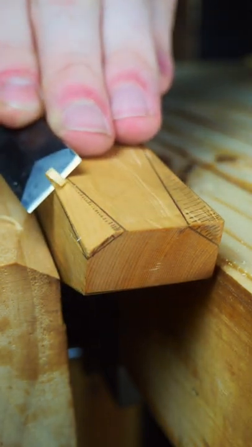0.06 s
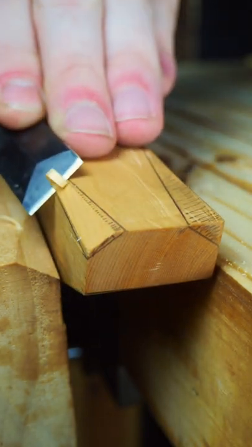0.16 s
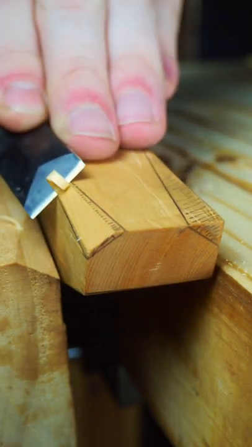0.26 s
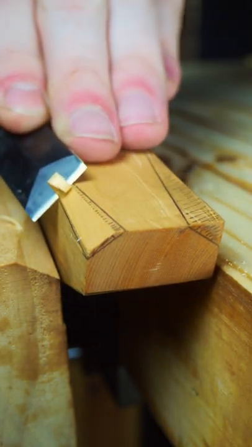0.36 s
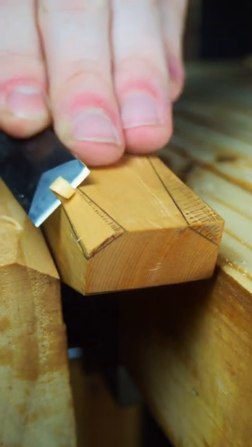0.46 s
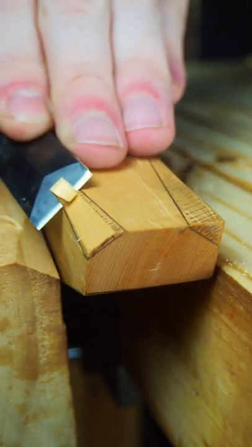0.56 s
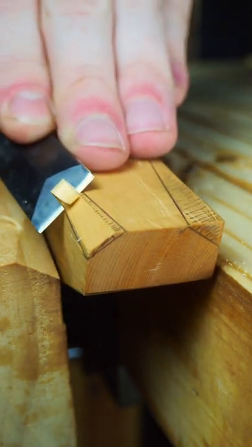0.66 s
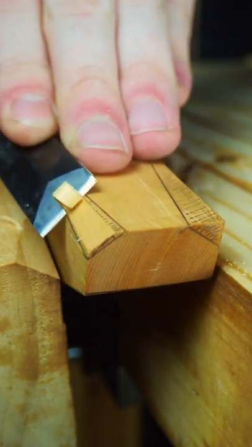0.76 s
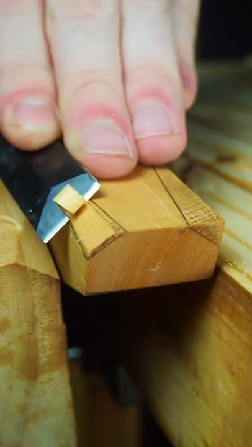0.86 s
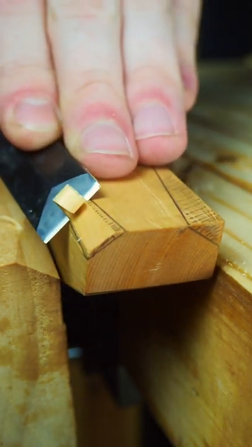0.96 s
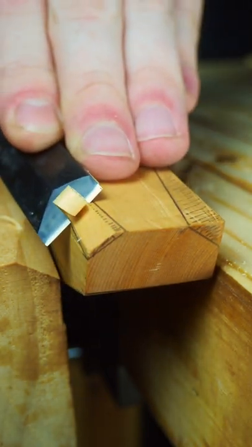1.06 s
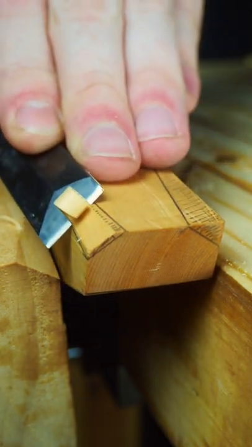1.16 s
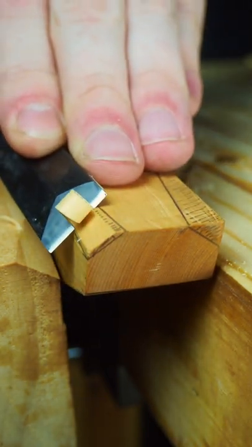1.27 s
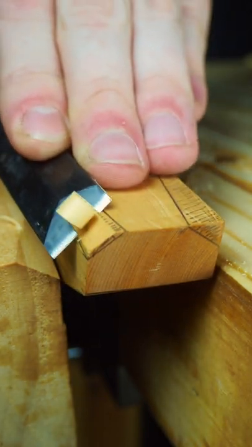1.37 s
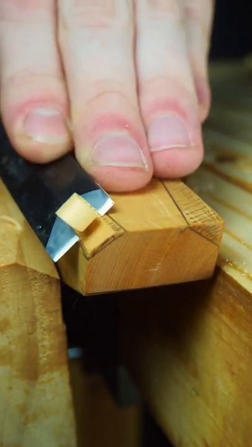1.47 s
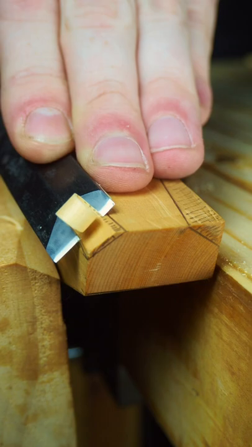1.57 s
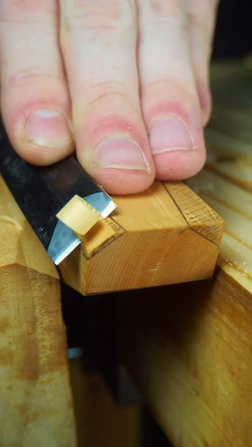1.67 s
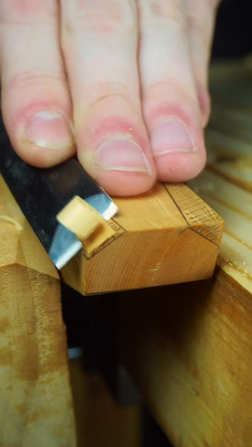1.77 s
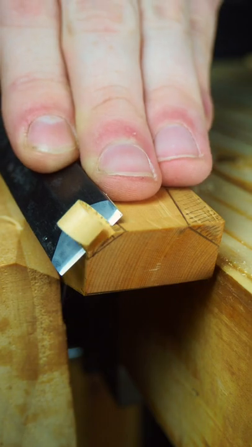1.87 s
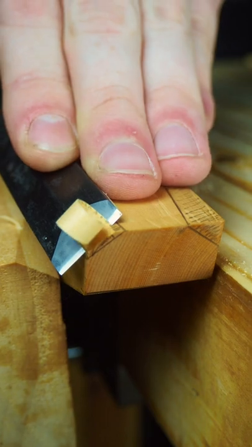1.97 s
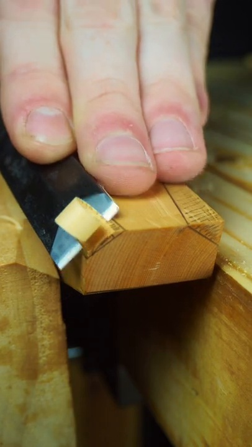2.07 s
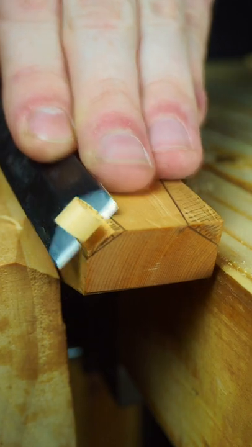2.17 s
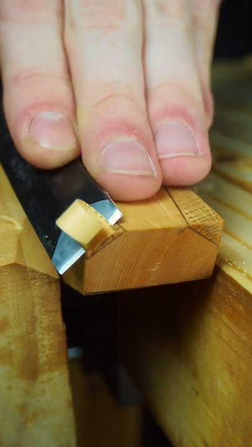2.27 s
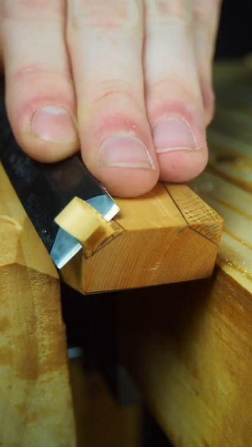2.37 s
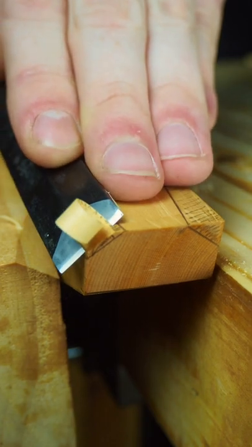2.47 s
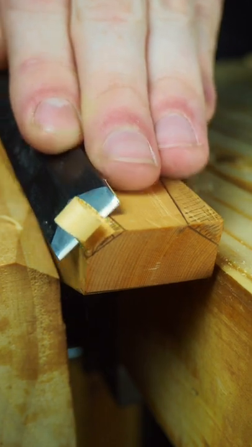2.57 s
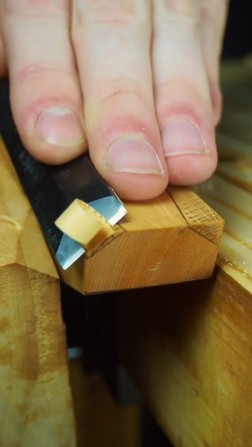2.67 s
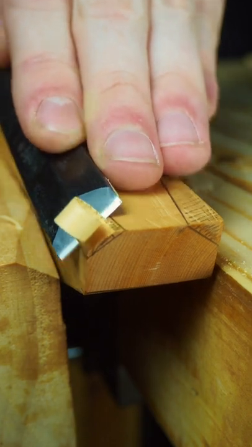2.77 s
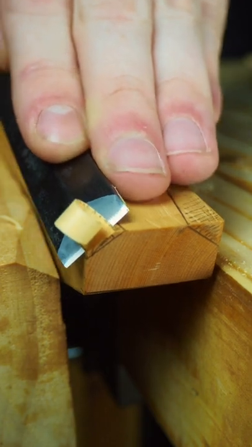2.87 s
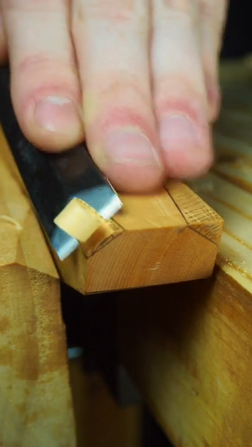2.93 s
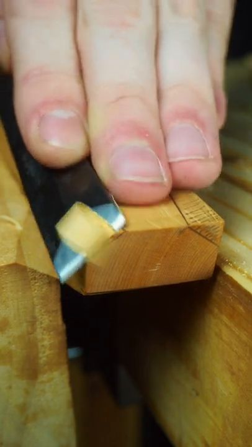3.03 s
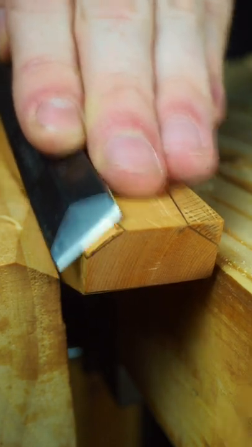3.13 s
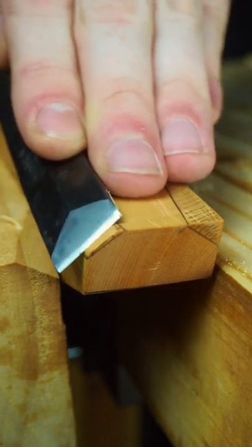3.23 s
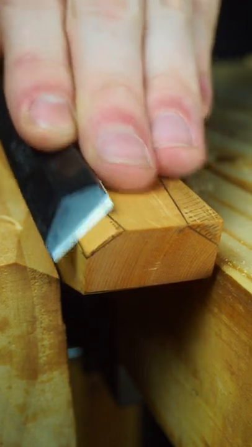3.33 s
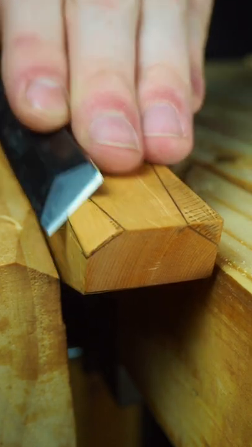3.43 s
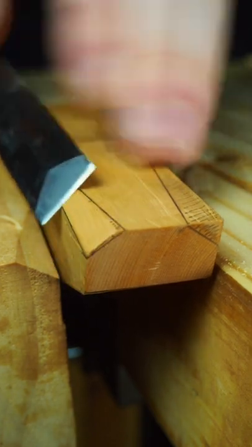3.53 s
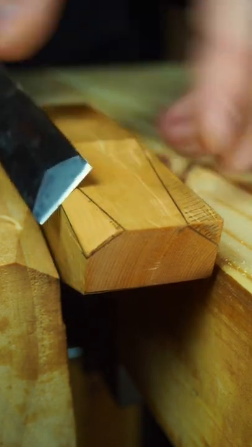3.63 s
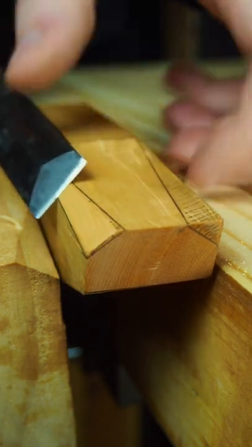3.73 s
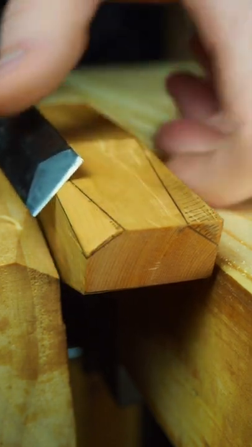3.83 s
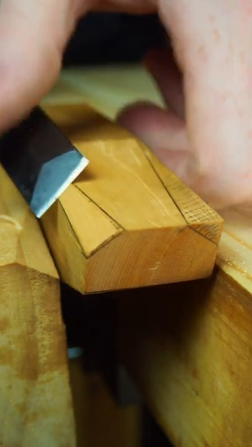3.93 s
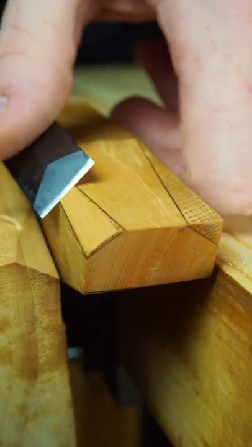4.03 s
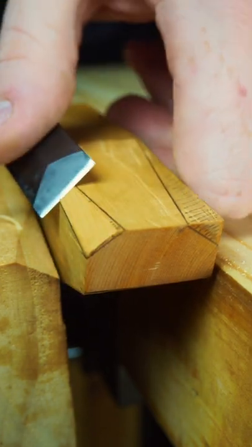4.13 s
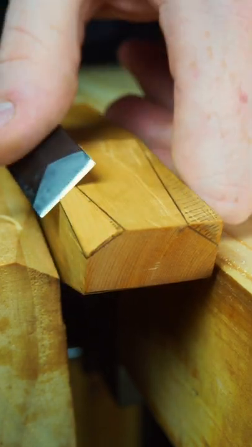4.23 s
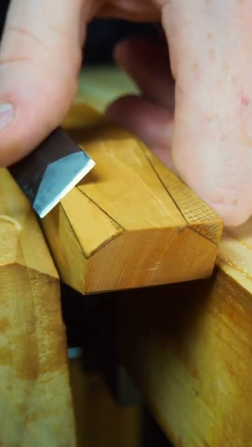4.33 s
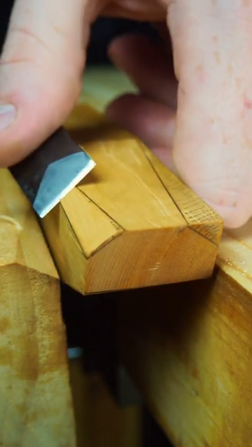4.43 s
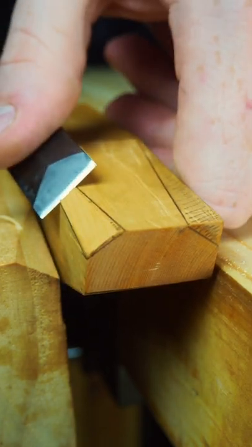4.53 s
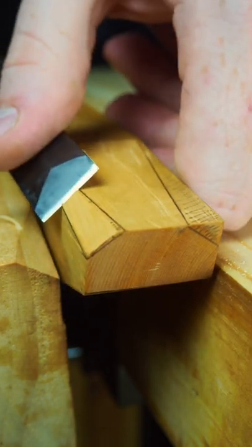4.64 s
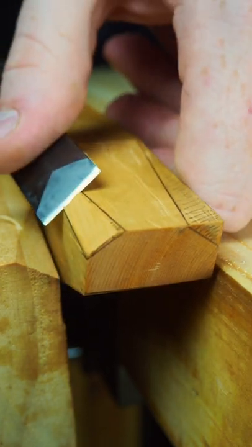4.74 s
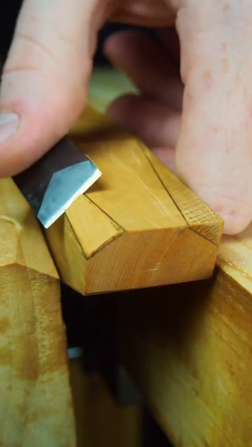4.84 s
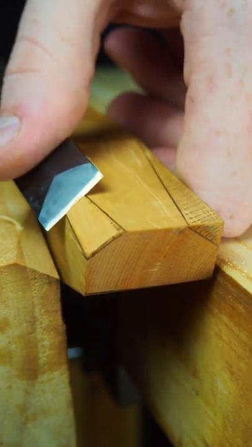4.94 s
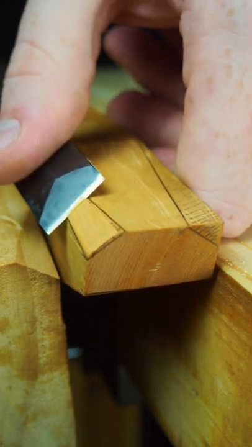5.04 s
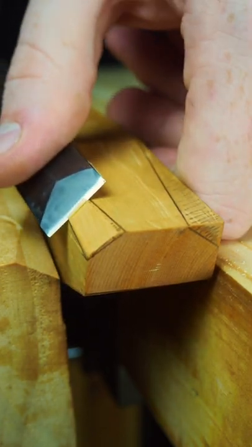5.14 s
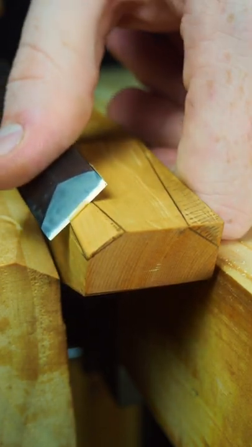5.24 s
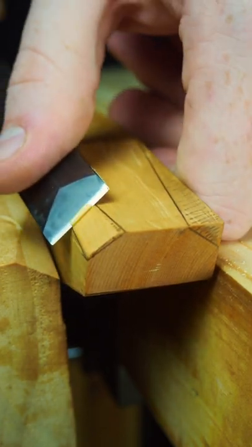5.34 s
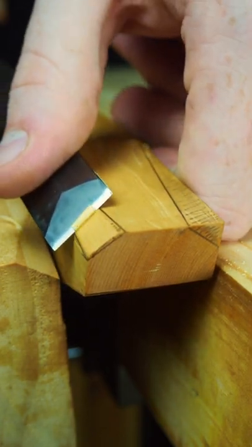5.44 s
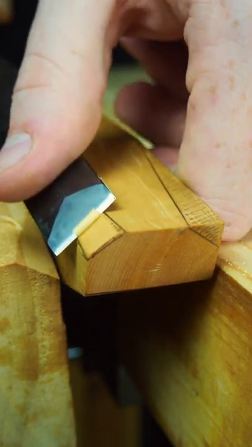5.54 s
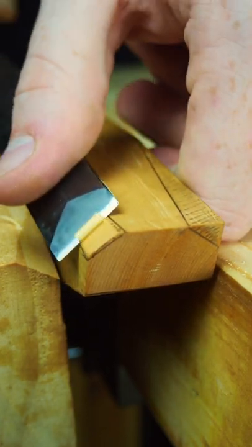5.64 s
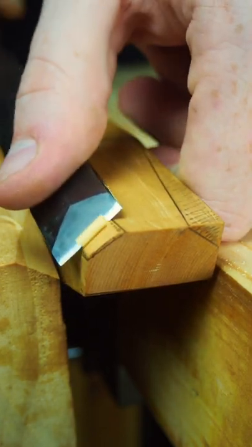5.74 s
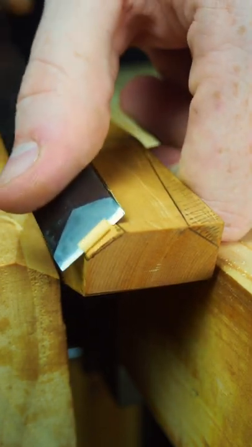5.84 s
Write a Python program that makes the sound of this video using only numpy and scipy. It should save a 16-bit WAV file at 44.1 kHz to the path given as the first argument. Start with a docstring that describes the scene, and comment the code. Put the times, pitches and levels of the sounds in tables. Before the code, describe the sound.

Dry wood fibres tear in brief uneven crunches under a steel blade, first light and bright, then deeper. Around the middle come hard low knocks and splintery cracks with tiny pings. After this, soft crackly finger touches, quiet air, and delicate scraping that slowly strengthens. Close stereo microphones, short room decay, faint hiss.

```python
"""Short nudges of a chisel through the corner of a clamped wooden block, heard close in stereo over quiet air.
Tearing fibres are dense random clicks that excite the resonances of bench, block and blade; late in the cut
the blade jerks free with knocks, and tiny very high pings, damped sine partials, cluster there. Fingers then
shift on the blade in puffs of filtered noise, and a second, softer cut begins. The air is shaped noise;
sparse decaying taps make the room."""
import sys
import numpy as np
from scipy import signal
from scipy.fft import rfft, irfft, next_fast_len
from scipy.io import wavfile
from scipy.ndimage import uniform_filter1d

SR = 44100
rng = np.random.default_rng(int(sys.argv[2]) if len(sys.argv) > 2 else 0)


def wav_record(signal):
    """Record a signal, one row per channel, as 16-bit PCM in the file named by sys.argv[1]."""
    frames = np.transpose(np.atleast_2d(signal))
    bounded = np.clip(frames, -1, 1)
    # unit amplitude maps onto the largest positive 16-bit level
    quanta = np.round(bounded * 32767).astype(np.int16)
    wavfile.write(sys.argv[1], SR, quanta)


N = 260190
# frequency grid [Hz] of the filters, padded by at least a second
HZ = np.fft.rfftfreq(next_fast_len(N + SR), 1 / SR)


def amp(db):
    """Decibel law: amplitude ratio of a level in dB."""
    return 10 ** (np.asarray(db) / 20)


def evened(x):
    """Normalisation to a mean power of one."""
    return x / np.sqrt(np.mean(abs(x) ** 2) + 1e-20)


def read(points, hz, order=1):
    """Interpolation of a table column along a logarithmic frequency axis."""
    columns = np.transpose(points)
    return np.interp(np.log(hz + 1), np.log(columns[0] + 1), columns[order])


def add(mix, s, sound):
    """Superposition: adds a sound to the mix in place, from s seconds on."""
    part = mix[..., round(s * SR):][..., :sound.shape[-1]]
    part += sound[..., :part.shape[-1]]


def through(x, response):
    """Linear filtering: the spectrum times a complex frequency response."""
    size = 2 * len(HZ) - 2
    return irfft(rfft(x, size) * response, size)[..., :N]


def slow_noise(width):
    """Low-passed noise: two running means over width samples, then unit power."""
    noise = rng.standard_normal(N)
    return evened(uniform_filter1d(uniform_filter1d(noise, width), width))


def air():
    """Workshop air as random short-time spectra, patchy in time and frequency, under a slow level."""
    # spectrum of the air before levelling: (frequency [Hz], relative level [dB per Hz])
    spectrum = [(15, -60), (25, -42), (53, -29), (66, -3.5), (87, -24), (141, 3.5), (180, -8), (503, -7.5),
                (641, -13), (1020, -5), (1330, -14.5), (1440, -12.5), (9840, -32.5), (14800, -43.5),
                (16000, -40)]
    # level of the air before the port gains: (time [s], level [dB])
    level_points = [(0.0, -57), (2.199, -56), (3.0, -49), (3.45, -55.5), (4.16, -61.5), (4.5, -64),
                    (5.4, -58.5), (5.9, -54.5)]
    # coherence of the two ports: (frequency [Hz], likeness [-1 to 1])
    likeness = [(60, 0.65), (180, 0.72), (550, 0.8), (1650, 0.2), (4970, 0.072), (15000, -0.26)]
    frames, hz = N // 256 + 5, np.fft.rfftfreq(1024, 1 / SR)
    a, b, c, d, patches = rng.standard_normal((frames, 513, 5)).T
    patches = evened(uniform_filter1d(uniform_filter1d(patches, 12, 0), 14, 1))
    same = np.clip(read(likeness, hz), -1, 1)[:, None]
    left = a + 1j * b
    right = same * left + np.sqrt(1 - same ** 2) * (c + 1j * d)
    z = np.array([left, right])
    z *= amp(read(spectrum, hz)[:, None] + 0.92 * patches)
    noise = evened(signal.istft(z, nperseg=1024, noverlap=768)[1][:, :N])
    level = amp(np.interp(np.arange(N) / SR, *np.transpose(level_points)))
    return level * amp([[1.1], [-1.1]]) * noise  # port gains in dB


def room(x):
    """Reverberation: sparse taps of random sign, each band decaying exponentially at its own rate."""
    # decay of the room: (frequency [Hz], time to fall 60 dB [s], left-right likeness [0 to 1])
    decay = [(100, 0.67, 1), (500, 0.21, 1), (2007, 0.3086, 0.17), (6000, 0.24, .1), (15000, 0.16, .1)]
    taps = np.zeros((2, SR))
    # one tap at a random place in every 20 samples
    at = np.arange(300, SR - 20, 20) + rng.integers(0, 20, (2, (SR - 301) // 20))
    np.put_along_axis(taps, at, rng.choice([-1., 1.], at.shape), 1)
    hz, t, (a, b) = signal.stft(taps, SR, nperseg=256)
    same = np.clip(read(decay, hz, order=2), 0, 1)[:, None]
    z = np.array([a, same * a + np.sqrt(1 - same ** 2) * b])
    fading = amp(-60 * t / read(decay, hz)[:, None])
    tail = signal.istft(z * fading, SR, nperseg=256)[1]
    return signal.fftconvolve(x, tail / np.linalg.norm(tail[0]), axes=1)[:, :N]


def touches():
    """Skin peeling off steel: crackly bursts, noise of peaky amplitude through a treble band-pass."""
    # finger contacts: (time [s], relative level [dB], band centre [Hz], decay constant [s])
    contacts = [(3.55, -58, 7380, 0.02), (3.5957, -57.5, 13200, 0.06), (3.707, -43.5, 7300, 0.021),
                (3.7444, -42, 8900, 0.011), (3.802, -49, 6950, 0.0284), (3.895, -56.5, 7330, 0.057),
                (3.943, -60, 13000, 0.034), (4.083, -61.5, 14800, 0.02), (4.13, -65, 6620, 0.0214)]
    out, t = np.zeros((2, N)), np.arange(4096) / SR
    f = np.fft.rfftfreq(4096, 1 / SR)
    thin = f ** 6 / (f ** 6 + 6500.0 ** 6)  # weakens the range below 6500 Hz
    grits = rng.standard_normal((len(contacts), 2, 4096))
    for (s, db, hz, length), grit in zip(contacts, grits):
        puff = grit * abs(grit) * np.minimum(t / 0.0022, 1) * np.exp(-t / abs(length))
        band = np.exp(-(np.log((f + 1) / hz) / 0.48) ** 2)
        add(out, s, amp(db - 7.5) * irfft(rfft(puff) * thin * band))
    return out


def pings():
    """Free vibration: exponentially decaying sines, soon damped, mostly right; upper partials rattle."""
    # pings, thickest after the jerks: (time [s], level before the port gain [dB], time until damped [s])
    strikes = [(.398, -55.5, .05), (.632, -66, .04), (.915, -62, .04), (1.94, -62, .06),
               (2.3211, -48.5, 0.041), (2.3735, -39.5, 0.07), (2.4912, -51, 0.07), (2.5396, -44.5, 0.05),
               (2.582, -50.5, 0.08), (2.7372, -50.5, 0.083), (2.7955, -52, 0.077), (2.832, -50, 0.07),
               (2.8844, -58, 0.07), (2.9272, -53, 0.064), (2.9851, -44, 0.07), (3.0305, -44, 0.095),
               (3.1303, -53, 0.07), (3.1877, -46, 0.054), (3.2385, -40.5, 0.08)]
    # partials, the first one steady: (frequency [Hz], relative level [dB], time to fall 60 dB [s])
    partials = [(15009, 0, .4), (15272, -11, 0.15), (15240, -9, .15), (15698, 4, .2)]
    first, upper, t = np.zeros(N), np.zeros(N), np.arange(SR // 4) / SR
    rattle = amp(5.0 * slow_noise(150))
    for (s, db, length), phase in zip(strikes, rng.random((len(strikes), 4))):
        attack, damping = np.clip(t / .002, 0, 1), np.clip((length - t) / .02, 0, 1)
        gate = attack * damping * (.45 + .55 * np.exp(-t / 0.011))
        for k, (hz, mode_db, t60) in enumerate(partials):
            sine = np.sin(2 * np.pi * (hz * t + phase[k]))
            ring = gate * amp(db + mode_db - 60 * t / t60) * sine
            add(upper if k else first, s, ring)
    return (first + rattle * upper) * amp([[-14.0], [5.0]])


def modes(table, order=1):
    """Modal superposition: damped resonances of alternating sign; order 2 gives steeper skirts."""
    total = 0
    for k, (f, width, db) in enumerate(table):
        resonance = 1j * HZ * width / (f ** 2 - HZ ** 2 + 1j * HZ * width)
        total = total + (-1) ** k * amp(db) * resonance ** order
    return total


def bodies():
    """Resonant responses at unit mean power: bench, block, bending, then light grip, firm grip and rasp
    (each as shaving range and edge range), and splinters."""
    # vice and bench: (frequency [Hz], width [Hz], relative level [dB])
    bench = [(65.1, 11, -23.5), (95, 19, -24.5), (123.4, 12, -12.5), (157, 15, -13.5), (205, 18, -11.5),
             (253.7, 16, -16), (303.6, 46, -5.5), (335.9, 36.25, -1.5)]
    # wooden block: (frequency [Hz], width [Hz], relative level [dB])
    block = [(381.5, 13, 3), (432.8, 52.4, 0), (524.2, 46, 3), (620, 32, -9), (671, 27, -13),
             (784.6, 35, -19)]
    # bending of the blade: (frequency [Hz], width [Hz], relative level [dB])
    bending = [(917, 28, -7.5), (1057, 300, -7.5), (1146, 36.6, 3.5)]
    # blade, damped by a firm grip: (frequency [Hz], width [Hz], held lightly [dB], held firmly [dB])
    blade = [(1430, 90, 4, -8), (1813, 100, 2, -2.5), (2022, 42, 5, 1.5), (2315, 200, 9.5, 3),
             (2862, 160, -6, -10), (3494, 250, 0, -3), (4030, 84, -11.5, -12.5), (5114, 190, 8.5, -5.5),
             (5586, 370, -5, -7), (6386, 900, -7, -12.5), (8500, 410, -22, -15), (9230, 250, 0.5, -6),
             (10140, 1230, -7, -6.5), (11580, 500, -34.5, -15), (13300, 660, -20.5, -22.5),
             (14800, 780, -16, -23.5)]
    # broad rasp of quick cutting: (frequency [Hz], relative level [dB per Hz])
    tearing = [(710, -38.5), (1200, 3.5), (1280, -2.5), (1670, -0.5), (2390, -1.5), (2650, -7),
               (4050, -9.5), (4540, -15.5), (6790, -18.5), (9930, -23.5), (15000, -24)]
    # splitting wood rings broadly: (frequency [Hz], width [Hz], relative level [dB])
    splinters = [(900, 980, -1.5), (1202, 450, 1), (1490, 540, -13)]
    shaving_hz, edge_hz = 1300, 4500  # lower ends of the two bright ranges
    edge = 1 / (1 + (edge_hz / (HZ + 1)) ** 8)
    shaving = (1 - edge) / (1 + (shaving_hz / (HZ + 1)) ** 8)
    light_grip, firm_grip = [modes(np.array(blade)[:, [0, 1, held]], order=2) for held in (2, 3)]
    rasp = amp(read(tearing, HZ))
    bright = [h * np.sqrt(part) for h in (light_grip, firm_grip, rasp) for part in (shaving, edge)]
    radiation = (1j * HZ / (1j * HZ + 111.0)) ** 2  # small parts radiate no deep bass
    lowpass = 1 / np.sqrt(1 + (HZ / 14900.0) ** 60)  # steep: the cutting sound ends near 14.9 kHz
    responses = [modes(bench), modes(block), modes(bending)] + bright + [modes(splinters, order=2)]
    return [evened(h * radiation * lowpass) for h in responses]


def ports(common, own):
    """Stereo coherence: two ports share a part with a lag and a bounce, and each adds its own part."""
    # level difference: (frequency [Hz], left over right [dB])
    lean = [(60, -0.5), (99, -4), (160, 1.5), (270, 2.5), (450, 1), (740, 2.5), (1220, -0.5), (2010, 1),
            (3330, -3.5), (5500, 2.5), (9080, 9.5), (15000, -11.5)]
    # coherence: (frequency [Hz], power share of the tearing common to both ports [0 to 1])
    coherence = [(100, 0.97), (700, 0.91), (2000, 0.61), (5000, 0.43), (14000, 0.46)]
    # reflection off the bench top, left then right: (delay [s], share before the treble filter)
    reflections = [(.00031, 0.47), (.00052, 0.15)]
    lag_s = 5e-5  # the right port is nearer to the cut
    same = np.clip(read(coherence, HZ), 0, 1)
    side = np.array([[1], [-1]])
    place = amp(side * read(lean, HZ) / 2) * np.exp(-1j * np.pi * side * HZ * lag_s)
    treble = HZ ** 2 / (HZ ** 2 + 21000.0 ** 2)  # only short waves mirror off the small top
    bounce = np.array([1 + share * treble * np.exp(-2j * np.pi * HZ * s) for s, share in reflections])
    shared = through(common, place * bounce * np.sqrt(same))
    return shared + through(own, place * np.sqrt(1 - same))


def fibres(per_s=3500.0, spread_db=5.5, hiss=0.61, judder_db=2.0):
    """Fracture as a random pulse train of uneven clicks over friction hiss, with a stick-slip judder."""
    size = amp(spread_db * np.minimum(rng.exponential(1, (3, N)), 4))
    size = size * rng.choice([-1., 1.], (3, N))
    clicks = evened(size * (rng.random((3, N)) < per_s / SR))
    judder = slow_noise(300)
    return evened((clicks + hiss * rng.standard_normal((3, N))) * amp(judder_db * judder))


def quick(db, knee_db):
    """Nonlinear excitation: slow cutting rings the blade, quick loud cutting takes a larger rasp share."""
    return np.clip(0.095 + 0.86 / (1 + amp(-1.3 * (db - knee_db))), 0, 1)


def nudge(rise, hold, fall, *tops_db):
    """Envelope law: each layer's level in dB rises, sags while held, then falls in a straight line."""
    # The edge speaks first, the block loads later and lets go later; rows push, bending, tearing, hiss:
    # (stretch of the rise [ratio], extra hold [s], stretch of the fall [ratio], sag while held [dB/s])
    layers = [(1.43, 0.005, 1.025, 16), (1.13, .001, 1.02, 45), (1.06, 0.001, 0.97, 22),
              (1.02, .001, 0.51, 19.5)]
    rise_db = 18  # a nudge starts this far under its top
    t = np.arange(0, .7, 1 / SR)
    late, linger, slow, sag = np.transpose(layers)[..., None]
    up = max(rise, 1 / 500) * late
    held = max(hold, 0) + abs(linger)
    rising = rise_db * np.clip(1 - t / up, 0, 1) ** 1.11
    sagging = sag * np.clip(t - up, 0, held)
    falling = 20 * np.maximum(t - up - held, 0) / (max(fall, 1 / 50) * slow)
    return t, np.array(tops_db)[:, None] - rising - sagging - falling


def nudge_forces():
    """Power addition: overlapping nudges set the force of the fibre noise on each body."""
    # nudges of the blade; timings are then limited and stretched by layer: (time [s], rise [s], hold [s],
    # fall for 20 dB [s], push into the block [dB], bending [dB], tearing shaving [dB], edge hiss [dB])
    nudges = [(0, 0.0017, 0.052, 0.13, -42, -47.5, -50.5, -58),
              (0.187, 0.0044, 0.011, 0.87, -51.5, -59, -58.5, -74),
              (0.256, 0.013, .012, -0.08, -41.5, -53.5, -44.5, -56),
              (0.291, 0.0063, .025, 0.15, -47.5, -56, -56.5, -69),
              (0.385, 0.015, .02, 0.2, -53, -50.5, -52.5, -60.5),
              (0.431, .016, 0.063, -0.04, -38, -41, -43, -53),
              (.515, 0.01, 0.051, 0.12, -48.5, -46, -49, -56.5),
              (0.662, .014, 0.019, 0.01, -51, -43, -52.5, -57.5),
              (0.703, .01, 0.024, 0, -58, -54, -54, -59.5),
              (0.787, 0.025, 0.092, .045, -37.5, -43.5, -44, -46),
              (1.043, .018, .01, 0.08, -57.5, -69, -54, -50.5),
              (1.202, .03, .07, -0.09, -48, -58.5, -46.5, -49),
              (1.375, .025, .05, 0.08, -34.5, -50, -41.5, -41),
              (1.635, 0.021, 0.0048, 0.03, -46.5, -57, -50.5, -49.5),
              (1.809, .02, .045, 0.0652, -31, -46, -38, -39), (2.2, .05, .01, 0.12, -55, -42.5, -48, -48),
              (2.255, 0.0017, .002, 0.17, -33, -34, -46.5, -85),
              (2.439, .02, .005, 0.12, -60, -43, -50, -47.5),
              (2.462, .004, .002, 0.1051, -29.5, -38.5, -49.5, -70),
              (2.634, .01, .03, -1.7, -47.5, -53.5, -55, -66),
              (2.669, .003, .002, 0.1738, -23, -27.5, -33, -66),
              (2.844, .022, .002, 0, -49.5, -45.5, -50.5, -48),
              (2.861, .003, .002, 0.1424, -23, -24.5, -35.5, -65),
              (2.928, .03, .02, 0.12, -38, -44, -55.5, -65),
              (3.04, .015, .02, 0.1032, -33, -35.5, -42, -51),
              (3.058, .04, .02, 0.0086, -25, -29, -32, -42.5),
              (3.177, 0.0023, 0.0071, 0.09, -37, -30, -36.5, -61),
              (3.208, .015, .02, 0.12, -46.5, -41, -57, -78),
              (4.633, .04, .02, 0.16, -60, -61.5, -63, -65.5), (4.722, .02, .02, 0.2, -66, -63, -67, -73.5),
              (4.788, .02, .04, 0.9, -69, -62, -70, -73), (4.887, .02, .015, 0.14, -55, -69, -59.5, -66.5),
              (5.051, .03, .02, 0.17, -57.5, -65, -57, -62.5), (5.198, .03, .03, 0, -58, -53, -59, -66),
              (5.283, .01, .01, 6, -63, -73, -61, -65), (5.333, .04, .02, 0.07, -40.5, -48, -47.5, -51),
              (5.446, .025, .07, 0.19, -45.5, -54, -46.5, -48),
              (5.644, .04, .03, 0.17, -46.5, -64, -46, -47.5), (5.781, .03, .08, -11, -55, -56, -50, -57)]
    # a deeper cut loads the bench more: (time [s], bench over push [dB])
    depth_points = [(0, -7.5), (1.3, -12), (1.8, -2), (2.3, -2), (3.2, 3), (4.6, -4), (5.9, -3)]
    damp_s = 0.77, 1.06  # the fingers close on the blade between these times
    power = np.zeros((10, N))
    for s, *row in nudges:
        t, (push, bend, tear, hiss) = nudge(*row)
        depth = np.interp(s + t, *np.transpose(depth_points))
        bite = max(tear.max(), (push + 2 * depth).max() - 4.0)  # a deep cut rasps even when slow
        rasp = np.array([quick(bite, -42.0), quick(tear.max(), -40.0)])[:, None]
        firm = np.interp(s, damp_s, [0, 1])
        split = quick(bend + 2.0 * depth, -49.0)  # deep cuts splinter
        low, bright = amp(bend), amp([tear, hiss])
        ring = bright * np.sqrt(1 - rasp)
        rows = [amp([push + depth, push]), low * np.sqrt(1 - split),
                ring * np.sqrt(1 - firm), ring * np.sqrt(firm),
                bright * np.sqrt(rasp), low * np.sqrt(split)]
        add(power, s, np.vstack(rows) ** 2)
    level = np.sqrt(abs(uniform_filter1d(power, 40)))
    # the edge range of each grip and of the rasp takes a second, independent set of fibres
    grain = np.array([fibres(), fibres()])[[0, 0, 0, 0, 1, 0, 1, 0, 1, 0]]
    return level[:, None] * grain


def add_knocks(force):
    """Impulsive excitation: the blade jerks free with one blow, a burst of splinters and a crunching tail."""
    # jerks: (time [s], relative level [dB], crack over the thud [dB], thin snap over the thud [dB])
    jerks = [(2.26, -17, -7.5, -30), (2.335, -31.5, -8.5, -14), (2.468, -20, -20, -42.5),
             (2.497, -29, 2, -32), (2.672, -6, -2, -41), (2.865, -5, -11, -45), (3.105, -15.5, -34, -16),
             (3.185, -26, 7, -33.5)]
    t = np.arange(6000) / SR
    grits = rng.standard_normal((len(jerks), 3, 6000))
    for (s, db, crack, snap), grit in zip(jerks, grits):
        burst = .5 * np.exp(-t / 0.0047)
        crunch = 0.086 * abs(grit) * np.exp(-t / 0.019)
        blow = 1.09 * np.exp(-t / 0.00027) + grit * (burst + crunch)
        # rows as in bodies(); the firm grip is practically silent
        reach = db + np.array([-9, -8, crack - 14, crack - 12, snap - 6, -99, -99,
                               crack - 9, snap - 6, crack - 14])
        add(force, s, amp(reach)[:, None, None] * blow)


def chisel(patchy_db=3.0):
    """Forced resonance: forces ring block and blade; parts of the spectrum swell as the contact shifts."""
    force = nudge_forces()  # (body, path): the common path, then the own path of each port
    add_knocks(force)
    paths = sum(through(f, h) for f, h in zip(force, bodies()))
    hz, t, z = signal.stft(ports(paths[0], paths[1:]), SR, nperseg=512, noverlap=384)
    patches = uniform_filter1d(rng.standard_normal((len(t), len(hz))), 9, 0)
    patches = uniform_filter1d(uniform_filter1d(patches, 5, 1), 5, 0)
    patches = evened(patches).T * (hz > 700)[:, None]  # only above 700 Hz
    return signal.istft(z * amp(patchy_db * patches), SR, nperseg=512, noverlap=384)[1][:, :N]


def scene():
    """Superposition of direct sound, its reverberation, pings and air."""
    near = chisel() + touches()
    return near + amp(-13.5) * room(near) + pings() + air()


def record(dry):
    """Transduction: white self-noise of the microphone is added, then a low-pass limits the band."""
    hiss_db, edge_hz = -76.5, 16000
    wet = dry + amp(hiss_db) * rng.standard_normal(dry.shape)
    lowpass = signal.firwin(1023, edge_hz, window=("kaiser", 10), fs=SR)
    return signal.oaconvolve(wet, lowpass[None], "same")


dry = scene()
out = record(dry)
wav_record(out)
```